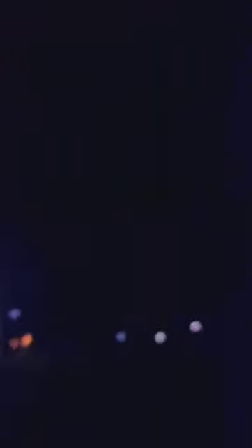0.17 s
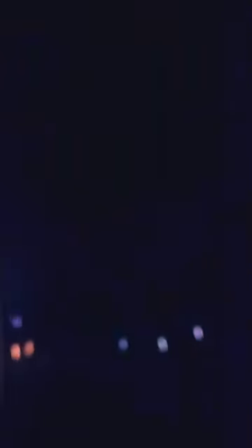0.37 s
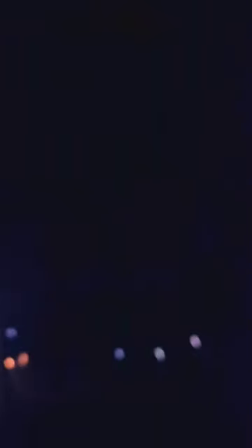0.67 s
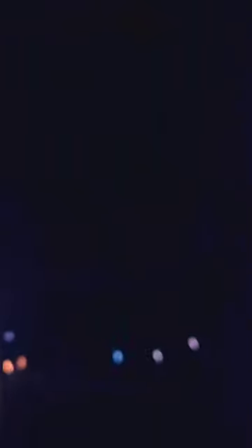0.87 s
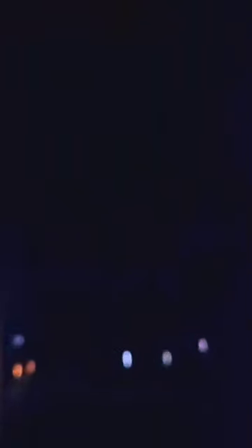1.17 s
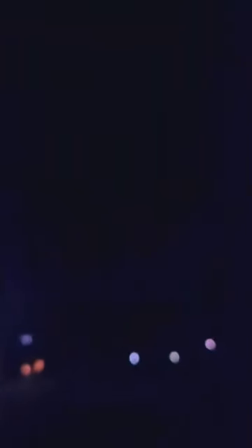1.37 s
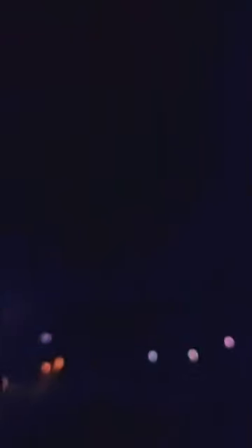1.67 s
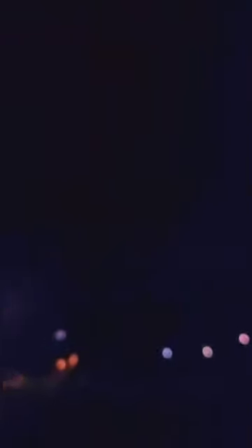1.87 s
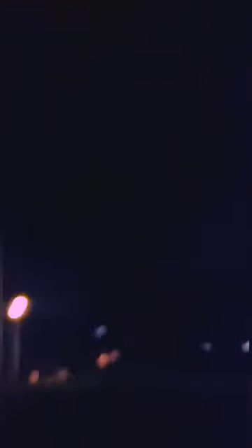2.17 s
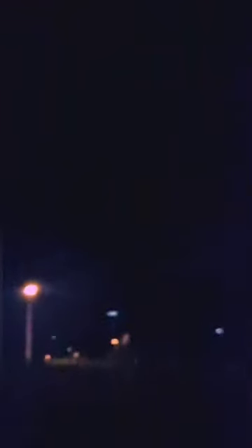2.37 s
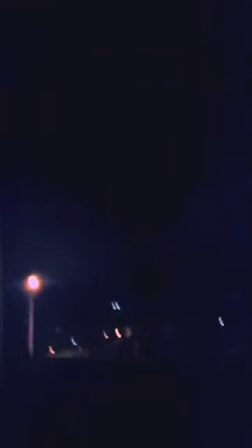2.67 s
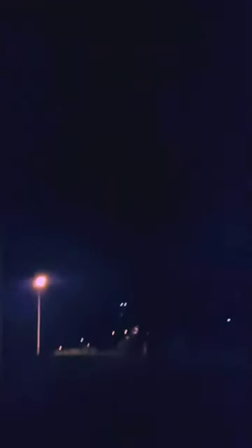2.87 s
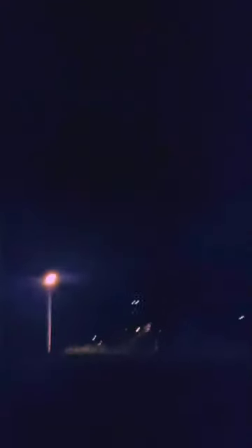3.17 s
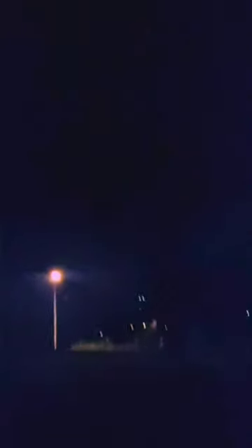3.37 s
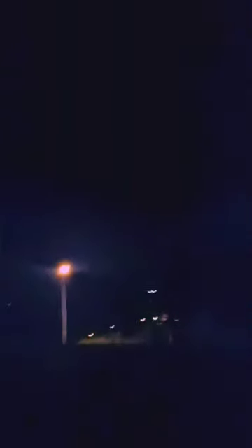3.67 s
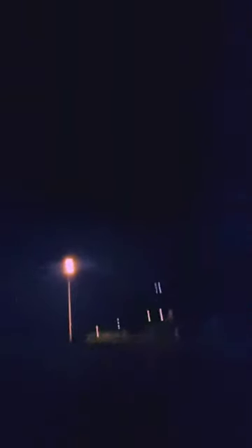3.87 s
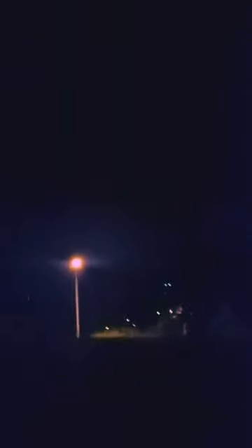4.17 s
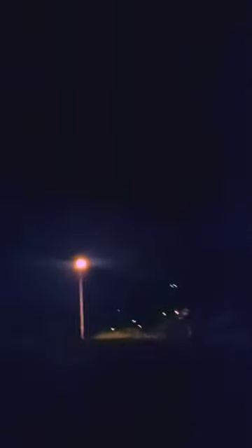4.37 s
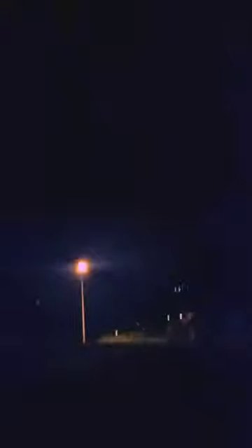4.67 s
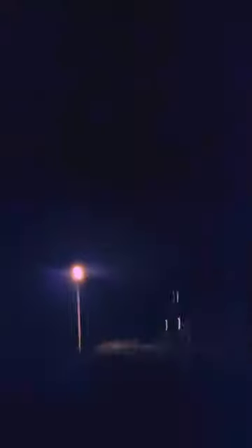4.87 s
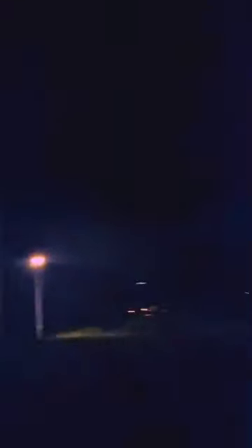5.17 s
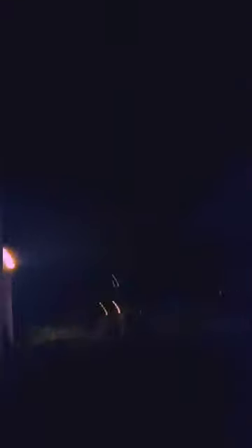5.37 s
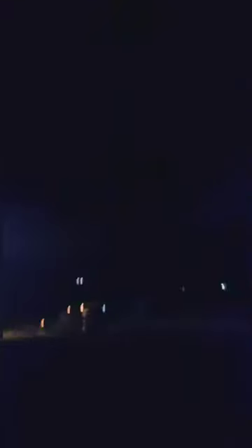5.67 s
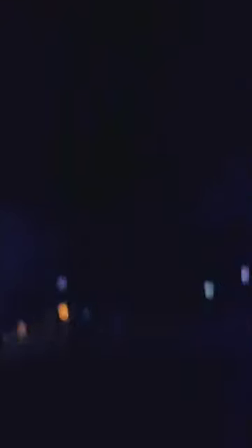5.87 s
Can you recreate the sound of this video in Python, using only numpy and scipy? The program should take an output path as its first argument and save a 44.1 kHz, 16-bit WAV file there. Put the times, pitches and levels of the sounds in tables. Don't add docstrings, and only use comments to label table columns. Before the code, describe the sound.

A hand-held phone picks up a distant exchange of gunfire in the dark. One gun booms steadily, a lighter one cracks irregularly across it, and a third thuds from behind cover. The dense burst lasts about three and a half seconds, then a pause, one strong shot cluster and a few fading pops. Each shot smears into grainy echoes off walls and trees. Low traffic, soft clothing rustle and tiny grip ticks lie underneath.

```python
import sys
import numpy as np
from scipy import signal
from scipy.fft import rfft, irfft
from scipy.io import wavfile
from scipy.ndimage import uniform_filter1d

SR = 44100
rng = np.random.default_rng(int(sys.argv[2]) if len(sys.argv) > 2 else 0)


def dump_mix(stems):
    frames = np.atleast_2d(stems).T
    limited = np.clip(frames, -1, 1)
    pcm = np.round(limited * 32767).astype(np.int16)
    wavfile.write(sys.argv[1], SR, pcm)


def to_linear_factor(level_db):
    exponent = np.asarray(level_db, float) / 20
    return 10 ** exponent


N = 265878
SIZE = 8192
HZ = np.arange(SIZE // 2 + 1) * SR / SIZE
LEAD_MS = 12


def coloured(table, alike_hz):
    hz = np.arange(N // 2 + 1) * SR / N + 1
    table_hz, table_db = np.transpose(table)
    gain = to_linear_factor(np.interp(np.log(hz), np.log(table_hz), table_db, -90, -90))
    mid, side = rfft(rng.standard_normal((2, N))) * gain
    side = side * np.clip(hz / alike_hz, 0, 1)
    x = irfft(np.array([mid + side, mid - side]), N)
    return x / x.std()


def wander(hold, smooth):
    return uniform_filter1d(np.repeat(rng.standard_normal(N // hold + 1), hold), smooth)[:N]


def bandpass(x, low_hz, high_hz, order=2):
    return signal.sosfilt(signal.butter(order, [low_hz, high_hz], "bandpass", fs=SR, output="sos"), x)


def blast(hz, cycles, sharp_hz):
    t = np.arange(SIZE) / SR
    wave = np.cos(2 * np.pi * hz * t) * np.exp(-t * hz / cycles)
    return rfft(wave) / (1 + 1j * HZ / sharp_hz) ** 2


def scatter(count, first_ms, fade_ms, db, ears_ms):
    u, size, ear = rng.random((count, 3)).T
    ms = first_ms + 6.1 * fade_ms * u ** 1.5
    path_db = db - 8.7 * (ms - first_ms) / fade_ms - 9.0 * size
    sign = np.sign(rng.random(count) - .4)
    return np.c_[ms, path_db, ears_ms * (ear - .3)], sign


def add(out, s, db, spectrum, paths, litter, pan_db=0, loose_ms=0.064, roll_db=0):
    extra, sign = litter
    ms, path_db, ear_ms = np.r_[paths, extra].T
    shift_ms = loose_ms * np.clip(rng.standard_normal(len(extra)), -2, 2)
    ms = LEAD_MS + ms + np.r_[np.zeros(len(paths)), shift_ms]
    gain = to_linear_factor(path_db) * np.r_[np.ones(len(paths)), sign]
    hz = HZ[:SIZE // 5]
    spectrum = spectrum[:len(hz)]
    left, right = [gain @ np.exp(-2j * np.pi * np.outer(ms + late_ms, hz) / 1000) * spectrum
                   for late_ms in (ear_ms, 0)]
    bare = spectrum * np.exp(-2j * np.pi * LEAD_MS * hz / 1000)
    shot = irfft(np.array([left, right, bare]), SIZE)
    shot = shot / np.abs(shot[2]).max() * to_linear_factor(db + np.array([[pan_db / 2], [-pan_db / 2], [roll_db]]))
    i = int((s - .0003 - LEAD_MS / 1000) * SR) + SIZE
    out[:, i:i + SIZE] += shot


# pitch_hz, level_db (per Hz)
NIGHT_SPECTRUM = [(40, -4.5), (70, 3.5), (120, 5), (200, -5.5), (400, -10), (800, -13.5), (1500, -20.5),
                  (2500, -21), (3300, -38), (4200, -39.5), (6500, -33.5), (9000, -44.5), (12000, -45),
                  (15500, -47)]


def traffic():
    swell_db = wander(4000, 4000)
    night = coloured(NIGHT_SPECTRUM, alike_hz=600) * to_linear_factor(-56.5 + 1.5 + swell_db)
    night[0] = np.roll(night[0], int(.45 * SR / 1000))
    return night


# pitch_hz, level_db (per Hz)
CLOTH_SPECTRUM = [(1200, -19), (2000, 11), (3000, -2), (4200, -3.5), (5500, -4), (7000, -1.5), (9000, -9),
                  (10500, -16), (12000, -12.5), (14000, -15), (15600, -10)]
# peak_s, level_db, swell_s, fade_s (times for a change of 17 dB)
CLOTH_STROKES = [(0.0, -58, .01, 0.013), (.03, -77.5, 0.039, .12), (0.122, -76, .03, 0.056),
                 (0.349, -76, .5, 0.4), (.55, -74.5, .3, 0.093), (.9, -72.5, 0.37, 0.56),
                 (1.059, -65.5, .12, .05), (1.431, -68.5, 0.032, 0.079), (1.55, -74.5, 0.43, .2),
                 (1.958, -64, 0.049, .12), (2.1, -74, 0.16, 0.45), (2.551, -71.5, 0.16, 0.21),
                 (2.67, -67, 0.097, 0.027), (2.87, -77.5, 0.37, 0.37), (3.081, -66.5, .06, 0.12),
                 (3.189, -69, 0.048, .04), (3.27, -79.5, .15, 0.21), (3.612, -64, 0.13, 0.062),
                 (3.73, -75, 0.091, .08), (4.099, -64, 0.035, 0.19), (4.62, -73, 0.17, 0.083),
                 (4.75, -70.5, 0.042, 0.13), (5.07, -74.5, 0.076, 0.7), (5.29, -70.5, 0.27, 0.088),
                 (5.66, -72.5, 0.29, 0.039), (5.871, -75.5, 0.9, 0.08), (6.03, -84, .2, .1)]


def clothes():
    now = np.arange(N) / SR
    slide = to_linear_factor(-88.5)
    for s, db, swell_s, fade_s in CLOTH_STROKES:
        away = np.maximum((s - now) / swell_s, (now - s) / fade_s)
        slide = np.maximum(slide, to_linear_factor(db - 17 * away))
    flicker = wander(200, 200)
    crackle = uniform_filter1d(np.repeat(rng.exponential(size=N // 30 + 1), 30), 30)[:N]
    hiss = coloured(CLOTH_SPECTRUM, alike_hz=9000) * slide
    return hiss * to_linear_factor(2.5 * flicker + 1.65 * crackle + 8.5) * to_linear_factor([[-1.5], [1.5]])


# start_s, peak_db
BOOM_SHOTS = [(0.402, -11.1), (0.5607, -7.0), (0.8252, -6.5), (1.0739, -6.5), (1.333, -6), (1.5862, -6),
              (1.8501, -5.5), (2.1104, -7.5), (2.383, -6), (2.6552, -7), (2.681, -7.5), (2.9372, -7),
              (3.2101, -7), (3.4889, -8)]
# delay_ms, level_db, left_ear_late_ms
BOOM_ROUTES = [(0, 0, .09), (1.72, -1, .09), (3.35, -6.5, .05), (5.0, -12, .1)]
# start_s, delay_ms, level_db, thump_db
SIDE_WALL = [(.4, 4.98, -11, -10.5), (1.3, 4.95, -7, -13.5), (1.9, 4.9, -4, -11), (2.701, 5.9, -1, -9.5),
             (3.498, 6.22, -3, -10)]
# delay_after_it_ms, level_db, left_ear_late_ms
SECOND_WALL = [(3.9, -10.5, 0.06), (6.0, -13, 0.59), (8.1, -10, 0.03)]


def booming_gun(out, rumble):
    boom = blast(hz=547, cycles=0.54, sharp_hz=3000)
    thump = blast(hz=238, cycles=0.38, sharp_hz=900)
    litter = scatter(count=50, first_ms=8.8, fade_ms=8.4, db=-5.5, ears_ms=0.27)
    wall_s, *columns = np.transpose(SIDE_WALL)
    earlier = (-.014, -5)
    for s, db in [earlier] + list(BOOM_SHOTS):
        ms, wall_db, thump_db = (np.interp(s, wall_s, c) for c in columns)
        wall = np.array(BOOM_ROUTES[:3]) + [ms, wall_db, -.3]
        behind = np.array(SECOND_WALL) + [ms, wall_db, 0]
        add(out, s, db - 0.5, boom, np.r_[BOOM_ROUTES, wall, behind], litter, pan_db=-1.2)
        add(out, s + ms / 1000, db + thump_db + 4.0, -thump, [(-0.38, 0, 0.35)], rumble, roll_db=-10)


# pitch_hz, near_db, near_t60_s, far_db
FIELD_ROLL = [(103, -40.5, 0.25, -51), (206, -31, 0.37, -42), (284.4, -36, 0.38, -51),
              (402, -33, 0.55, -44.5), (700, -32, 0.65, -51), (1248, -34, 0.8, -62), (2258, -40, 0.91, -64)]


def field(bare):
    t = np.arange(2 * SR) / SR
    mid, side = rng.standard_normal((2, 2 * SR))
    lumps = to_linear_factor(2.0 * np.repeat(rng.standard_normal(SR // 150), 300))
    response = 0
    for hz, near_db, t60_s, far_db in FIELD_ROLL:
        pair = mid + min(hz / 1820.0, 1) * side * np.array([[1], [-1]])
        decay = to_linear_factor(near_db - 60 * t / t60_s) + to_linear_factor(far_db - 60 * t / 1.98)
        response = response + decay * bandpass(pair, hz / 1.45, hz * 1.45)
    onset = 1 - np.exp(-(t / 0.007) ** 2)
    response = response * uniform_filter1d(lumps, 150) * onset
    return signal.fftconvolve(bare[None], response, axes=1)[:, :len(bare)]


# start_s, level_db, pulse_hz, left_minus_right_db
TREE_PUFFS = [(0.062, -20.5, 613, 0), (2.85, -51, 600, 12), (2.89, -44.5, 803.4, 7), (3.61, -29, 656, 3),
              (4.209, -18.5, 1090, 2.5), (4.239, -36, 505, -4), (4.265, -41, 900, 21),
              (4.479, -24, 860, 0.5), (4.71, -26.5, 493, 0), (4.81, -36, 710, 9), (5.115, -40, 434, -3),
              (5.193, -33, 1700, -1), (5.256, -25.5, 685, -4), (5.27, -32, 1800, -17),
              (5.355, -34.5, 600, 1), (5.612, -36, 790, -3), (5.756, -34.5, 805, -6.5),
              (5.831, -46.5, 1030, -19)]


def tree_line(out):
    litter = scatter(count=90, first_ms=0.06, fade_ms=26, db=-3.5, ears_ms=0.81)
    for s, db, hz, pan_db in TREE_PUFFS:
        puff = blast(hz, cycles=0.23, sharp_hz=2.2 * hz)
        add(out, s, db, puff, [(0.042, -28, 0.0099)], litter, pan_db, loose_ms=4.0, roll_db=3.5)


# start_s, peak_db
GRIP_TICKS = [(.112, -56), (.432, -50), (1.019, -56), (2.141, -52), (2.157, -56), (3.18, -54), (3.305, -57),
              (5.2805, -39), (5.4, -58), (5.618, -50), (5.871, -57)]


def grip():
    out = np.zeros((2, N))
    t = np.arange(200) / SR
    for s, db in GRIP_TICKS:
        i = int(s * SR)
        tick = rng.standard_normal((2, 200)) * np.exp(-t / .0004)
        tick = tick - uniform_filter1d(tick, size=12)
        out[:, i:i + 200] += to_linear_factor(db + 3) * tick / np.abs(tick).max(axis=1, keepdims=True)
    return out * to_linear_factor([[-1.5], [1.5]])


# start_s, peak_db, pulse_hz, left_minus_right_db
CRACK_SHOTS = [
    (0.2521, -8, 830, -2.5),
    (0.452, -6.5, 1210, -2),
    (0.6767, -7.5, 924, -1),
    (1.3077, -13, 1000, -2.5),
    (1.4997, -9, 890, -2.5),
    (1.815, -11, 1000, -1),
    (2.439, -13, 1470, 1),
    (2.797, -4.5, 1134, 1.5),
]
# delay_ms, level_db, left_ear_late_ms
CRACK_ROUTES = [(-.55, 0, .1), (1.1, -5, .05), (2.2, -11, .1), (3.6, -5, .1), (4.5, -12, .05)]


def cracking_gun(out, litter):
    for s, db, hz, pan_db in CRACK_SHOTS:
        crack = blast(hz, cycles=0.33, sharp_hz=6700)
        add(out, s, db, crack, CRACK_ROUTES, litter, pan_db, roll_db=-4.5)


# start_s, level_db, pulse_hz, left_minus_right_db
FACADE_ANSWER = [(.4, -17, 640, 4.5), (1.069, -17, 580, 2.5), (1.85, -21, 620, 5), (2.38, -20, 754, 2.5),
                 (2.67, -18, 700, 3.5), (3.21, -15, 950, 2.5), (3.491, -14.5, 980, 11)]
# start_s, peak_db, pulse_hz, left_minus_right_db
CRACK_ECHOES = [
    (0.322, -31, 738, 1),
    (1.385, -30, 794, -5),
    (2.173, -22, 902, 1),
]
# delay_ms, level_db, left_ear_late_ms
FACADE_ROUTES = [(0, 12, -.05), (1.7, 14, -.05), (3.3, 11, 0), (4.9, 6, -.05)]


def facade(out):
    litter = scatter(count=50, first_ms=3.445, fade_ms=18, db=13.0, ears_ms=0.68)
    answer_s, *columns = np.transpose(FACADE_ANSWER)
    s, db = np.transpose(BOOM_SHOTS)
    delay_ms = 67.9 + 7.5 * s
    answer_db, hz, pan_db = (np.interp(s, answer_s, c) for c in columns)
    answers = np.c_[s + delay_ms / 1000, db + answer_db, hz, pan_db]
    for s, db, hz, pan_db in np.r_[answers, CRACK_ECHOES]:
        echo = blast(hz, cycles=0.47, sharp_hz=2.0 * hz)
        add(out, s, db - 8.5, echo, FACADE_ROUTES, litter, pan_db, loose_ms=0.35, roll_db=10.5)


# start_s, peak_db, pulse_hz, front_edge_hz, left_minus_right_db
THUD_SNAPS = [
    (2.0434, -7.5, 496, 2480, -1),
    (2.049, -20, 533, 2530, 6),
    (4.1151, -11.5, 600, 4060, -6),
    (4.3789, -23.5, 507, 2600, -3.5),
    (4.3812, -29.5, 433, 1530, 1),
    (4.6078, -28.5, 517, 2570, 4),
    (5.1535, -30.5, 533, 2520, -1),
]
# delay_ms, level_db, left_ear_late_ms
THUD_ROUTES = [(0, 0, .1), (7.0, -10, .1), (10, -9, .1), (14, -11, .1)]
# start_s, peak_db, pulse_hz
COVER_THUMPS = [
    (2.0495, -8.5, 326),
    (4.128, -19.5, 215),
    (4.3842, -20, 265),
    (4.610, -21.5, 234),
    (5.1547, -23, 231.4),
]


def dull_gun(out, rumble):
    for s, db, hz, sharp_hz, pan_db in THUD_SNAPS:
        snap = blast(hz, cycles=0.46, sharp_hz=sharp_hz)
        add(out, s, db, snap, THUD_ROUTES, rumble, pan_db, loose_ms=0.79)
    for s, db, hz in COVER_THUMPS:
        thump = -blast(hz, cycles=0.43, sharp_hz=1000)
        add(out, s, db, thump, THUD_ROUTES[:2], rumble, loose_ms=0.85, roll_db=-8.5)


# start_s, peak_db, pulse_hz, left_minus_right_db
LONE_SNAPS = [
    (4.1208, -6.5, 1000, 4),
    (4.738, -28, 1400, -1),
    (5.2808, -22, 1990, 0),
    (5.711, -25, 2080, -1.5),
    (5.723, -37, 1700, -2),
]


def lone_snaps(out, litter):
    for s, db, hz, pan_db in LONE_SNAPS:
        snap = blast(hz, cycles=0.73, sharp_hz=4640)
        add(out, s, db, snap, [(0.063, 0, 0.817)], litter, pan_db, roll_db=-8.5)


def insect():
    t = np.arange(N) / SR
    note = bandpass(rng.standard_normal(N), 3220 - 20, 3220 + 20)
    return to_linear_factor(-84) * note / note.std() * np.clip((t - 5.9) / 0.022, 0, 1)


def gunfire():
    out = np.zeros((3, N + 2 * SIZE))
    rumble = scatter(count=20, first_ms=4.295, fade_ms=10, db=-7.5, ears_ms=0.23)
    litter = scatter(count=40, first_ms=.6, fade_ms=8, db=-9, ears_ms=.4)
    booming_gun(out, rumble)
    tree_line(out)
    cracking_gun(out, litter)
    facade(out)
    dull_gun(out, rumble)
    lone_snaps(out, litter)
    return out


def shot_colour(far):
    trace = to_linear_factor(-16.5) * signal.sosfilt(signal.butter(4, 5200, fs=SR, output="sos"), far)
    far = signal.sosfilt(signal.cheby1(3, 1.5, 2900, fs=SR, output="sos"), far) + trace
    upper = signal.sosfilt(signal.butter(3, 189, "high", fs=SR, output="sos"), far)
    lower = signal.sosfilt(signal.butter(3, 118, "low", fs=SR, output="sos"), far)
    return upper + to_linear_factor(-6.5) * lower


def scene():
    shots = gunfire()
    far = (shots[:2] + field(shots[2]))[:, SIZE:SIZE + N]
    return shot_colour(far) + traffic() + clothes() + grip() + insect()


def roll_off(x):
    return signal.sosfilt(signal.butter(12, 15700, fs=SR, output="sos"), x)


def record(dry):
    heard = signal.sosfilt(signal.butter(3, 65, "high", fs=SR, output="sos"), dry)
    heard = heard + to_linear_factor(-21) * bandpass(heard, 1750, 2500, order=1)
    return roll_off(heard)


dry = scene()
out = record(dry)
dump_mix(out)
```